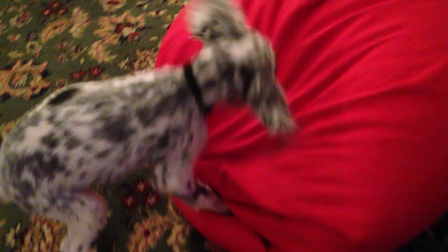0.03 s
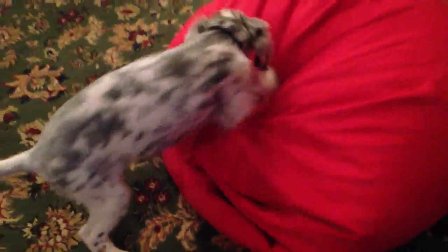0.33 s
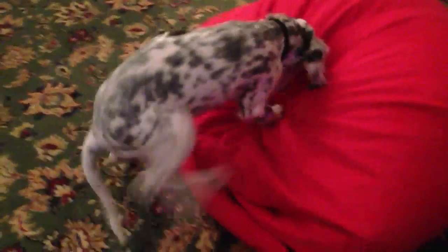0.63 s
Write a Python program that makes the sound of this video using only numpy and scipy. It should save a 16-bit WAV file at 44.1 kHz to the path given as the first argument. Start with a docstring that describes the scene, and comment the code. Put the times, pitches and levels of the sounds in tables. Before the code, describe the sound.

Cloth rustles and softly thumps as a puppy scrambles and shuffles on a beanbag.

```python
"""A puppy scrambles onto a cloth beanbag, close to one microphone in a carpeted room.
First its paws skim the tight cover with three bright hisses, and a claw draws a thin whistle.
From then on it keeps shuffling: each stroke rubs the cover (a gritty swish with a fine hiss of fur)
and shifts the filling (a low, lumpy rustle), while paws and buckling folds give short dull thumps.
The two loudest thumps come at about three seconds and just before the end."""
import sys
import numpy as np
from scipy import signal
from scipy.fft import rfft, irfft, next_fast_len
from scipy.io import wavfile
from scipy.ndimage import map_coordinates

SR = 44100
rng = np.random.default_rng(int(sys.argv[2]) if len(sys.argv) > 2 else 0)


def bounce(signal):
    """Save signal as a 16-bit WAV file at the path given by the first command-line argument."""
    frames = np.transpose(np.atleast_2d(signal))
    limited = np.clip(frames, -1, 1)
    pcm = np.round(limited * 32767).astype(np.int16)
    wavfile.write(sys.argv[1], SR, pcm)


N = 176400
T = np.arange(N) / SR

# Tone of the faint background rustle: frequency_hz, level_db
BACKGROUND_TONE = [(15, -76), (25, -52.5), (257, -6), (318, -6.5), (450, -10), (655, -20.5), (790, -17.5),
                   (1060, -19.5), (1180, -18.5), (1310, -18), (1960, -16.5), (2130, -16), (2700, -20.5),
                   (3350, -18.5), (4040, -19.5), (4620, -22), (8320, -26.5), (9270, -27.5), (15000, -29.5)]
# A claw crossing the weave: peak_s, half_length_s, pitch_hz, width_hz, level_db
CLAW_WHISTLE = (.43, .035, 13350, 160, -61)
# Paws skimming the tight cover: start_s, rise_s, fade_s, level_db
PAW_SKIMS = [(.118, .025, 0.049, -52), (.34, 0.015, .1, -51), (.75, 0.0074, 0.02, -56)]
# Tone of a skimming paw: frequency_hz, level_db
SKIM_TONE = [(3000, -27), (7000, -11), (9000, -3), (10300, 2.5), (12000, -1), (15000, -1.5)]
# Thumps of paws and folds: start_s, level_db, pitch_hz, rise_s, snap_db (relative to the thump), snap_hz
PAW_AND_FOLD_THUMPS = [ (.437, -29, 232, 0.0023, -14, 1500), (0.877, -35.5, 273, 0.0038, -25, 1000),
                       (0.903, -42, 380, 0.0021, -15, 1000), (.915, -33.5, 340, 0.0024, -4, 1000),
                       (1.023, -37, 250, 0.0037, -12, 900), (1.316, -39, 336, 0.0052, -20, 1210),
                       (1.497, -34.5, 218, 0.0031, -12.5, 1200), (1.792, -33.5, 270, 0.0025, -10, 2000),
                       (2.353, -32, 310, 0.0036, -23, 800), (2.675, -41.5, 258, 0.0035, -0.5, 880),
                       (2.956, -35, 261, 0.0022, -22, 700), (2.966, -32, 258, 0.0054, -28, 700),
                       (2.98, -30, 279, 0.0055, -24, 700), (2.999, -22.5, 278, 0.0023, -3.5, 1080),
                       (3.139, -38.5, 258, 0.0023, -22, 800), (3.78, -30, 272, 0.0047, -38, 600),
                       (3.823, -36.5, 307, 0.0036, -6, 800), (3.866, -38.5, 270, 0.0033, -12, 1500),
                       (3.932, -40, 229, 0.0026, -14, 1500), (3.957, -23, 224, .002, -5.5, 2360)]
# Strokes against the bag: peak_s, rise_s, fall_s, swish_db, fur_db, filling_db, scuff_db
BODY_STROKES = [ (.092, 0.012, 0.028, -56.5, -66, -62.5, -68), (.14, 0.026, 0.059, -62, -55, -84, -80),
                (.2, 0.014, 0.058, -47.5, -53.5, -52, -53), (.28, 0.022, 0.096, -63, -58.5, -58, -73),
                (.352, 0.014, 0.11, -63, -54, -55, -59), (0.439, 0.038, 0.063, -49.5, -54, -47.5, -55),
                (0.551, 0.059, 0.053, -53.5, -60, -52, -55),
                (0.714, 0.033, 0.038, -54.5, -57.5, -46.5, -54),
                (.768, 0.017, 0.053, -42.5, -49, -45.5, -54.5), (.885, 0.064, 0.073, -50, -58, -47, -51),
                (.985, 0.067, 0.1, -50.5, -56.5, -54.5, -61.5), (1.12, 0.034, 0.04, -53, -64, -49.5, -60.5),
                (1.23, 0.032, 0.047, -61, -65, -57, -77), (1.324, 0.048, 0.077, -58.5, -60, -52.5, -54.5),
                (1.522, 0.15, 0.09, -52.5, -61, -48.5, -59), (1.705, 0.036, 0.11, -51.5, -58.5, -57, -77),
                (1.791, 0.047, 0.063, -43.5, -53, -40.5, -55.5),
                (1.98, 0.14, 0.14, -56.5, -69.5, -55, -59.5), (2.23, 0.14, 0.12, -49.5, -56.5, -53, -60),
                (2.45, 0.1, 0.063, -50.5, -55.5, -49, -56), (2.638, .016, 0.067, -51, -60.5, -52.5, -63.5),
                (2.865, 0.052, 0.073, -65.5, -78, -57.5, -62),
                (3.004, 0.039, 0.047, -59.5, -74, -41.5, -54.5),
                (3.09, 0.092, 0.088, -54.5, -63, -48.5, -60), (3.285, 0.05, 0.13, -57, -69, -60, -68),
                (3.486, 0.055, 0.084, -49, -58.5, -52, -59.5), (3.66, 0.18, 0.19, -63, -78, -58, -70),
                (3.83, 0.034, 0.12, -57.5, -69, -53.5, -61), (3.974, 0.047, 0.041, -53, -69, -42, -53.5)]
# Tone of the rubbed cover: frequency_hz, level_db
SWISH_TONE = [(100, -35), (300, -16), (600, -5), (900, -6), (1250, -7), (1600, 0.5), (2050, 0.5),
              (2800, -7.5), (3500, -1.5), (4200, -1), (5200, -6), (6400, -16), (8200, -11.5),
              (10500, -46.5), (15000, -25)]
# Tone of the hissing fur: frequency_hz, level_db
FUR_TONE = [(500, -17), (3000, -15), (5500, -1.5), (6800, -1), (8300, 0.5), (10200, -2), (12500, -2.5),
            (15000, -9)]
# Tone of the shifting filling: frequency_hz, level_db
FILLING_TONE = [(25, -52), (65, -73), (100, -22.5), (150, -7), (200, 0.5), (260, -1), (310, 3), (400, -0.5),
                (520, -10.5), (750, -18), (1300, -26), (4000, -40)]
# Tone of the pressed cloth's dull scuff: frequency_hz, level_db
SCUFF_TONE = [(150, -32), (400, -6.5), (650, 1.5), (950, -0.5), (1300, -5.5), (2000, -11), (4000, -27)]

BACKGROUND_DB, BACKGROUND_WAVER_DB = -58.5, 1.1
ECHO_FADE_S, ECHO_DB = 0.097, -12  # the echo drops by 60 dB in this time
STROKE_SHAPE = 1.48  # 1 is pointed, 2 is rounded
FIBRE_SLIPS_PER_S, GRIP_FLUTTER_DB = 3000, 0.76
LUMPS_PER_S, FILLING_FLUTTER_DB = 260, 1.83
MIC_OPENS_S, MIC_LOW_HZ, MIC_TOP_HZ = 0.085, 134, 15330


def gain(db):
    """Turn decibels into a number to multiply a sound by."""
    return 10 ** (np.asarray(db) / 20)


def normalise(sound):
    """Scale a sound so that its average power is 1."""
    return sound / np.sqrt(np.mean(sound ** 2) + 1e-20)


def wobble(per_s):
    """A smooth curve through per_s random values each second."""
    return map_coordinates(rng.standard_normal(2048), [T * per_s], mode="wrap")


def filtered(sound, gain_at_hz):
    """Turn each frequency of a sound up or down."""
    size = next_fast_len(N + SR // 2)
    return irfft(rfft(sound, size) * gain_at_hz(np.fft.rfftfreq(size, 1 / SR)), size)[:N]


def friction(tone, slips_per_s, grit):
    """Rubbing noise shaped by a tone table: tiny slips over a smooth hiss; grit is their share of power."""
    slips = (rng.random(N) < slips_per_s / SR) * rng.standard_normal(N)
    noise = np.sqrt(grit) * normalise(slips) + np.sqrt(1 - grit) * rng.standard_normal(N)
    tone_hz, tone_db = np.transpose(tone)
    return normalise(filtered(noise, lambda hz: gain(np.interp(np.log(hz + 1), np.log(tone_hz), tone_db))))


def background_rustle():
    """Light, unbroken shuffling and the room make a faint, wavering rustle."""
    level = gain(BACKGROUND_DB + BACKGROUND_WAVER_DB * wobble(per_s=18))
    return level * friction(BACKGROUND_TONE, slips_per_s=900, grit=0.14)


def room_echo(sound):
    """A carpeted room answers after 5 ms with an echo that dies quickly."""
    t = np.arange(SR // 3) / SR
    tail = rng.standard_normal(len(t)) * gain(-60 * t / ECHO_FADE_S) * (t > 0.005)
    return gain(ECHO_DB) * signal.fftconvolve(sound, tail / np.linalg.norm(tail))[:N]


def claw_whistle():
    """Threads flick past a claw at an even rate, making a brief, thin whistle."""
    peak_s, half_length_s, pitch_hz, width_hz, level_db = CLAW_WHISTLE
    whistle = filtered(rng.standard_normal(N), lambda hz: np.exp(-((hz - pitch_hz) / width_hz) ** 2))
    swell = np.exp(-((T - peak_s) / half_length_s) ** 2)
    return gain(level_db) * swell * normalise(whistle)


def paw_skims():
    """A fast paw on tight cloth makes a very bright hiss that starts quickly and fades."""
    level = np.zeros(N)
    for start_s, rise_s, fade_s, level_db in PAW_SKIMS:
        t = np.maximum(T - start_s, 0)
        level += gain(level_db) * np.minimum(t / rise_s, 1) * np.exp(-(t / fade_s) ** 2)
    return level * friction(SKIM_TONE, slips_per_s=6000, grit=0.15)


def cover_thumps():
    """The slack cover snaps tight and swings a few times until the filling stops it."""
    thumps = np.zeros(N + SR)
    t = np.arange(SR // 10) / SR
    for start_s, level_db, pitch_hz, rise_s, snap_db, snap_hz in PAW_AND_FOLD_THUMPS:
        swell = (t / rise_s) ** 2 * np.exp(2 * (1 - t / rise_s))
        swing = -swell * np.sin(2 * np.pi * pitch_hz * t)
        snap_time = (t - rise_s / 2) * np.pi * snap_hz  # a higher snap_hz gives a sharper click
        snap = -snap_time * np.exp((1 - snap_time ** 2) / 2)
        thumps[round(start_s * SR):][:len(t)] += gain(level_db) * (swing + gain(snap_db) * snap)
    return thumps[:N]


def beanbag_strokes():
    """Each stroke swells and fades in four layers: rubbed cover, fur, filling and pressed cloth."""
    power = np.zeros((4, N))
    for peak_s, rise_s, fall_s, *levels_db in BODY_STROKES:
        from_peak = np.abs((T - peak_s) / np.where(T < peak_s, rise_s, fall_s))
        swell = np.exp(-from_peak ** STROKE_SHAPE)
        power += (gain(levels_db)[:, None] * swell) ** 2
    swish, fur, filling, scuff = np.sqrt(power)  # each layer's loudness over time
    grip = gain(GRIP_FLUTTER_DB * wobble(per_s=84))
    swish *= friction(SWISH_TONE, FIBRE_SLIPS_PER_S, grit=0.31)
    fur *= friction(FUR_TONE, FIBRE_SLIPS_PER_S, grit=0.3)
    scuff *= friction(SCUFF_TONE, slips_per_s=700, grit=0.3)
    filling *= gain(FILLING_FLUTTER_DB * wobble(per_s=34))
    filling *= friction(FILLING_TONE, LUMPS_PER_S, grit=0.42)
    return grip * (swish + fur + scuff) + filling


def scene():
    """All sounds reach one microphone, so left and right are the same."""
    thumps = filtered(cover_thumps(), lambda hz: 1 - 1 / (1 + (hz / MIC_LOW_HZ) ** 4))  # less deep bass
    puppy = beanbag_strokes() + paw_skims() + claw_whistle() + thumps
    mono = puppy + room_echo(thumps) + background_rustle()
    return np.array([mono, mono])


def record(dry):
    """The microphone opens just after the start and drops the very highest sounds."""
    return np.array([filtered(channel * (T > MIC_OPENS_S), lambda hz: hz < MIC_TOP_HZ) for channel in dry])


dry = scene()
out = record(dry)
bounce(out)
```